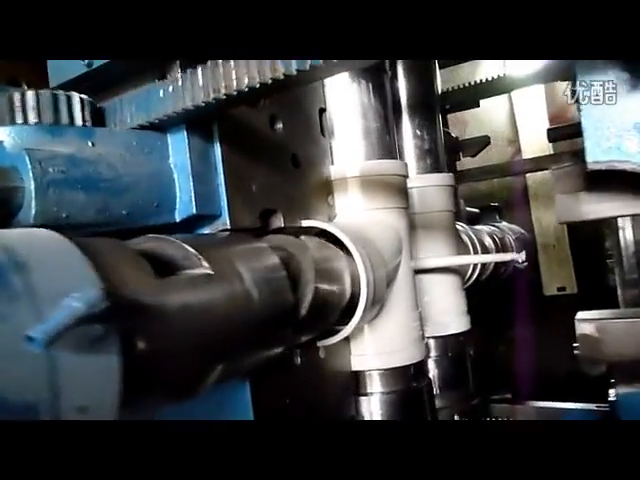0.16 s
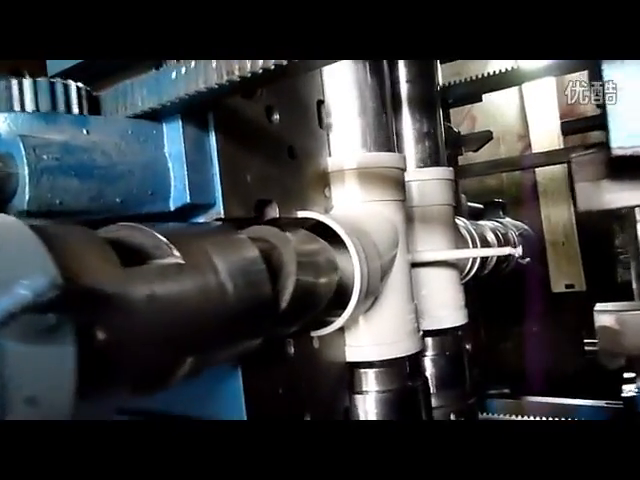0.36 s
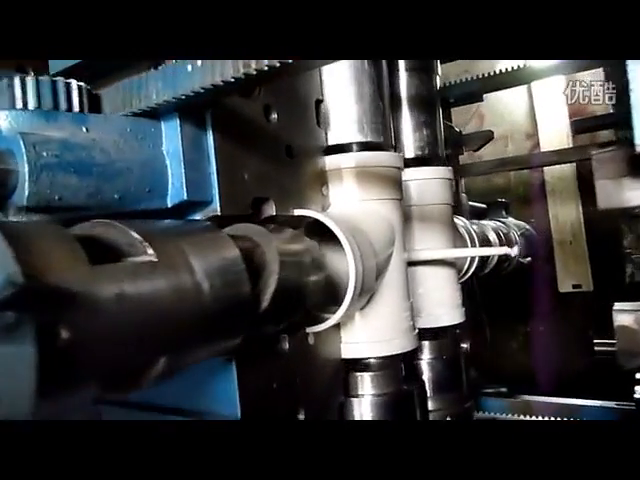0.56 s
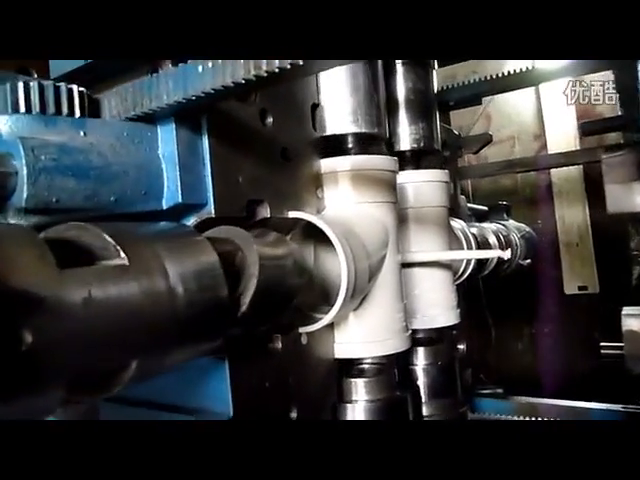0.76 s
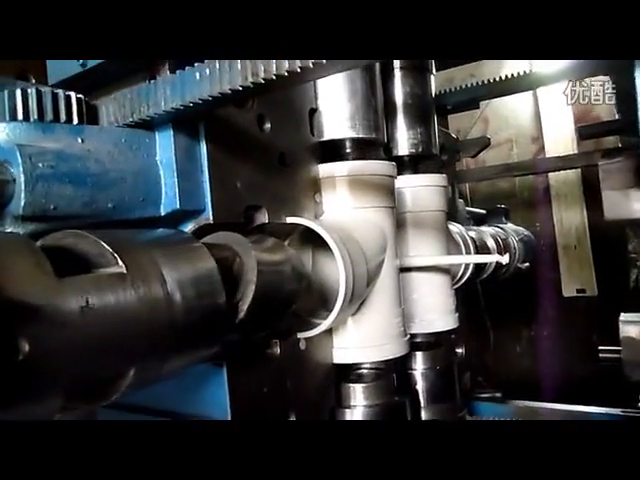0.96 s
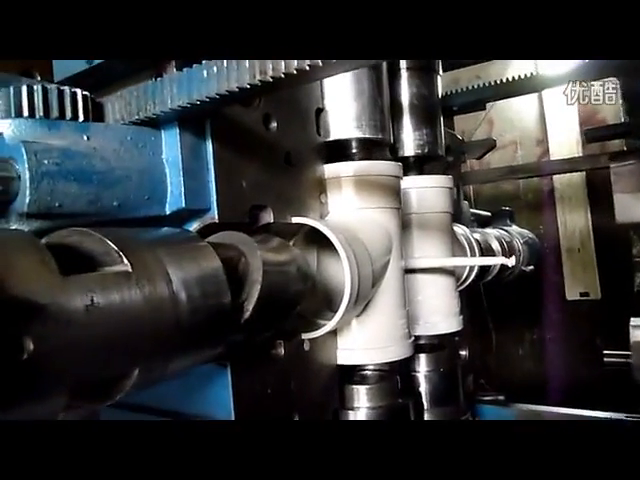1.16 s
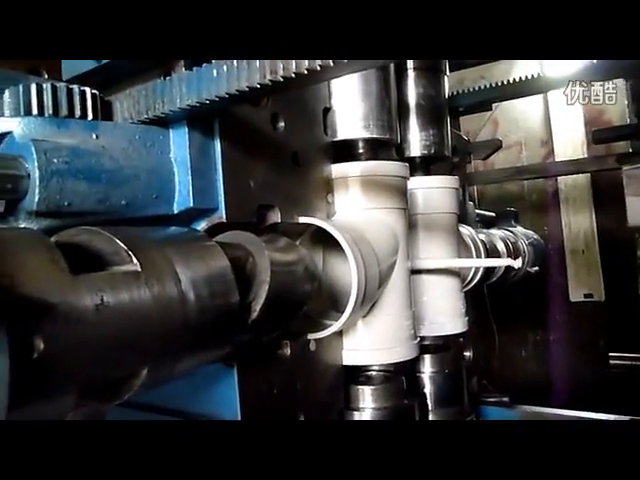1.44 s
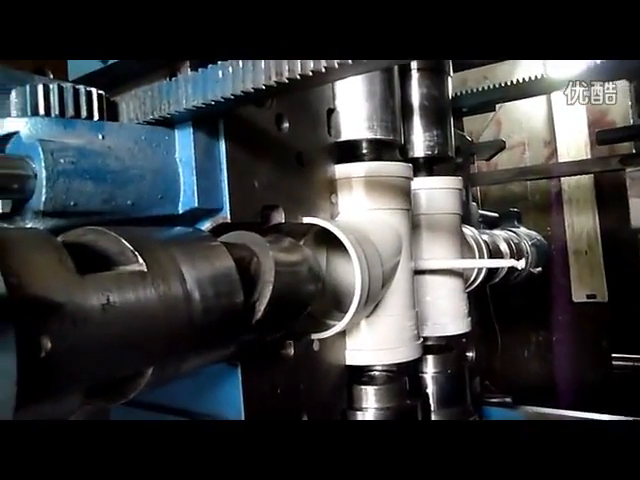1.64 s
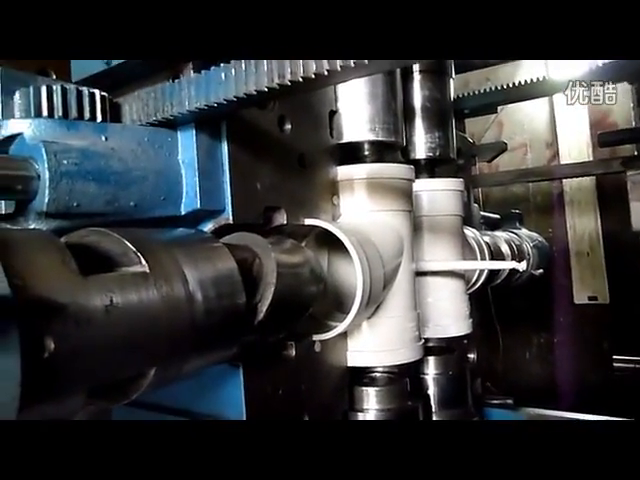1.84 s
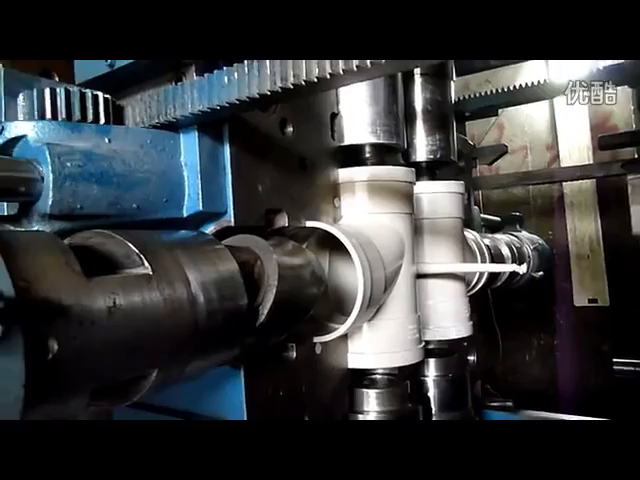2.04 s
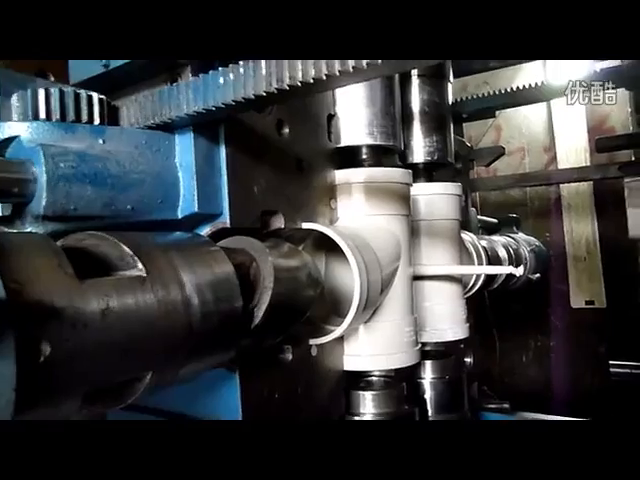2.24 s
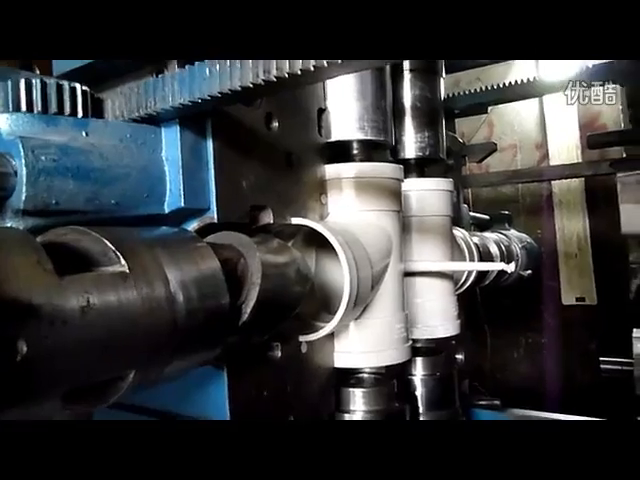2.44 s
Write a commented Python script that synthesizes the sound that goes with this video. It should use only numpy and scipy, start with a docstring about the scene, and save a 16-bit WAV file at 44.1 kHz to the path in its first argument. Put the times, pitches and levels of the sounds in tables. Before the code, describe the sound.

Steady hydraulic drone and hiss of a moulding machine, broken by a metal clack and thuds.

```python
"""On a factory floor, beside the open mould of an injection moulding machine. A hydraulic vane pump drones and
whines in a harmonic series, and turbulent oil hisses through a valve. A clack and a few thuds, the damped modes
of mould and frame, release the cores. These slide for a second with a rough rush of friction, the pump running
a little faster, and then the valve hiss returns. Drives whistle, the pump's shaft hums in its low orders and
the factory rumbles throughout."""
import sys
import numpy as np
from scipy import signal
from scipy.fft import rfft, irfft
from scipy.io import wavfile

SR = 44100
rng = np.random.default_rng(int(sys.argv[2]) if len(sys.argv) > 2 else 0)


def unload_audio(sound):
    """Save the sound as a 16-bit wav file, at the path given as the first command line argument."""
    columns = np.transpose(np.atleast_2d(sound))
    # keep every value between -1 and 1, then stretch to whole-number steps
    steps = np.round(np.clip(columns, -1, 1) * 32767)
    wavfile.write(sys.argv[1], SR, steps.astype(np.int16))


N = 113778


def undb(db):
    """Decibels to amplitude ratio."""
    return 10 ** (np.asarray(db) / 20)


def unit(x):
    """Normalisation to rms 1."""
    return x / np.sqrt(np.mean(x ** 2))


def curve(rows):
    """Linear interpolation between (seconds, value) points."""
    return np.interp(np.arange(N) / SR, *np.array(rows).T)


def walk(rate_hz):
    """Random fluctuation of rms 1: noise low-passed at rate_hz."""
    f = np.fft.rfftfreq(N, 1 / SR)
    return unit(irfft(rfft(rng.standard_normal(N)) * (f > 0) / (1 + (f / rate_hz) ** 4), N))


def colour(x, spectrum):
    """Spectral shaping by (Hz, relative dB) points, at rms 1."""
    hz, db = np.array(spectrum).T
    f = np.fft.rfftfreq(N, 1 / SR) + 1
    gain = undb(np.interp(np.log(f), np.log(hz), db))
    return unit(irfft(rfft(x) * gain, N))


def rush(spectrum, flicker_db=0, rate_hz=42):
    """Broadband noise with optional random amplitude modulation."""
    return colour(rng.standard_normal(N) * undb(flicker_db * walk(rate_hz)), spectrum)


def tone(hz):
    """A sinusoid of rms 1 whose phase is the integral of its frequency."""
    return np.sqrt(2) * np.sin(2 * np.pi * (np.cumsum(hz) / SR + rng.random()))


def load_level(loaded_db, free_db):
    """Load dependence: a level moves towards its free value while the cores slide."""
    freedom = curve([(.86, 0.29), (1.0, 0.78), (2.11, 1), (2.15, 0.65)])
    return loaded_db + (free_db - loaded_db) * freedom


def strike(blows, modes):
    """Modal superposition: each blow excites damped sinusoids, slightly detuned at random."""
    out = np.zeros(N)
    for start, peak_db in blows:
        age = np.maximum(np.arange(N) / SR - start, 0)
        ring = np.zeros(N)
        for hz, db, t60 in modes:
            detuned_hz = hz * (1 + 0.0067 * rng.standard_normal())
            ring += undb(db - 60 * age / t60) * np.sin(2 * np.pi * detuned_hz * age)
        out += undb(peak_db) * ring / np.abs(ring).max()
    return out


# Pump speed. Each row: time in seconds, vane-passing frequency in Hz.
VANE_RATE = [(0, 298.6), (.5, 298.6), (.87, 298.3), (.93, 299.5), (1.5, 299.45), (2.12, 299.5),
             (2.4, 298.5), (2.58, 299.0)]
# Each row: harmonic number, level under load in dB, level while the cores slide in dB.
PUMP_HARMONICS = [(1, -30, -31), (2, -29, -33), (4, -42, -45.5), (8, -46, -44), (9, -38, -64),
                  (13, -45.5, -40.5), (15, -47, -47.5), (16, -64, -57), (17, -47, -40), (19, -42, -51),
                  (20, -40, -47.5), (21, -57, -44.5), (22, -59, -51), (24, -45, -43.5), (26, -41.5, -41.5)]

def pump():
    """Periodic excitation: the vane pulses form a harmonic series on the vane-passing frequency."""
    vane_hz = curve(VANE_RATE) * (1 + 0.00041 * walk(12.3))
    return sum(tone(k * vane_hz) * undb(load_level(loaded, free) + 0.95 * walk(5.8))
               for k, loaded, free in PUMP_HARMONICS)


# Hiss spectra of the valve and the oil lines. Each row: frequency in Hz, relative density in dB.
VALVE_SPECTRUM = [(600, -52), (1300, -11.5), (1900, 9.5), (2700, -5), (3900, 7.5), (4700, 8), (5800, 4.5),
                  (7000, 2.5), (9000, -4.5), (13000, -43)]
LINES_SPECTRUM = [(4000, -31), (5800, -14), (7000, -6.5), (8300, -3), (9400, 1.5), (10100, -2),
                  (11300, -10.5), (12200, -22.5), (12800, -23), (13300, -49)]
# Envelopes of both hisses and of the valve's song. Each row: time in seconds, level in dB.
VALVE_ENVELOPE = [(0, -29.5), (.4, -30.5), (.78, -27), (.85, -28.5), (.93, -34.5), (1.1, -41.5),
                  (1.42, -49), (1.48, -30), (1.7, -47), (2.115, -43), (2.145, -28), (2.35, -29),
                  (2.58, -29.5)]
LINES_ENVELOPE = [(0, -30), (.78, -29.5), (.9, -32), (.99, -35), (1.06, -31.5), (1.2, -31), (1.4, -28),
                  (1.7, -27.5), (2.08, -29), (2.35, -27.5), (2.58, -29)]
SONG_ENVELOPE = [(0, -52), (.55, -55), (.66, -37), (.82, -38), (.9, -56), (2.11, -58), (2.16, -53),
                 (2.58, -45)]
# Reflections between the steel plates. Each row: delay in seconds, gain in dB.
PLATE_ECHOES = [(.00335, -17.5), (.0053, -22.5), (.0079, -8.5), (0.0101, -14.5)]

def oil():
    """Turbulent flow: hiss, modulated at the vane rate, is comb-filtered by short reflections."""
    ripple = 1 + .07 * tone(curve(VANE_RATE))
    valve = rush(VALVE_SPECTRUM) * undb(curve(VALVE_ENVELOPE))
    lines = rush(LINES_SPECTRUM, flicker_db=1.37, rate_hz=24) * undb(curve(LINES_ENVELOPE))
    hiss = (valve + lines) * ripple
    echoes = sum(undb(db) * np.roll(hiss, int(delay * SR)) for delay, db in PLATE_ECHOES)
    # The valve sings as the pressure peaks.
    song = tone(6864 + 12 * walk(60)) * undb(curve(SONG_ENVELOPE) + 2 * walk(24))
    return hiss + echoes + song


# Blows on the mould. Each row: start in seconds, peak level of the ring in dB.
MOULD_BLOWS = [(.8385, -7.5), (.8455, -22), (.853, -15), (1.153, -14), (1.473, -24), (2.464, -17)]
# Each row: mode frequency in Hz, relative level in dB, time to decay by 60 dB in seconds.
MOULD_MODES = [(525, -4, 0.09), (780, -2, 0.063), (890, 4.5, 0.038), (1170, -5, 0.017), (1253, -6, 0.042),
               (2320, -17, 0.017)]

def clacks():
    """Impact excitation: each blow rings the mould's modes and gives a brief broadband crack."""
    t = np.arange(N) / SR
    decay_s = .007
    bursts = sum(undb(db) * (t >= start) * np.exp(-np.abs(t - start) / decay_s)
                 for start, db in MOULD_BLOWS)
    spectrum = [(200, -30), (900, 9), (1300, 4), (2200, -3), (8000, -31), (12000, -50)]
    cracks = undb(-12) * bursts * colour(rng.standard_normal(N), spectrum)
    return strike(MOULD_BLOWS, MOULD_MODES) + cracks


# Blows on the frame. Each row: start in seconds, peak level in dB.
FRAME_BLOWS = [(.853, -14), (.865, -13), (.888, -21), (.903, -19.5), (.946, -18), (.987, -17)]
# Each row: mode frequency in Hz, relative level in dB, time to decay by 60 dB in seconds.
FRAME_MODES = [(70, -20, .15), (134, 11, 0.1), (164, -5, 0.073), (257, 5, 0.04)]

def thuds():
    """Damped free vibration: the struck frame sounds its low modes."""
    return strike(FRAME_BLOWS, FRAME_MODES)


# Friction noise of the cores. Each row: frequency in Hz, relative density in dB.
SLIDE_SPECTRUM = [(250, -24.5), (450, -0.5), (700, 1.5), (1000, 3.5), (1300, -3), (1700, -3.5), (3000, -53)]
# Its envelope. Each row: time in seconds, level in dB.
SLIDE_ENVELOPE = [(0, -42.5), (.98, -36), (1.02, -31), (1.16, -26.5), (1.28, -28.5), (1.65, -27.5),
                  (2.05, -31.5), (2.25, -34), (2.58, -39)]
# Resonances of the guides. Each row: centre frequency in Hz, bandwidth in Hz.
GUIDE_MODES = [(690, 68), (850, 50), (990, 62), (1210, 45)]

def slide():
    """Sliding friction: steel cores rub, ring their guides with fine catches and groan once."""
    t = np.arange(N) / SR
    catches_per_s, groan_hz, groan_at_s, groan_width_s = 700, 558, 1.51, .024
    catches = (rng.random(N) < catches_per_s / SR) * rng.standard_normal(N)
    rings = sum(signal.lfilter(*signal.iirpeak(hz, hz / width, fs=SR), catches)
                for hz, width in GUIDE_MODES)
    rub = rush(SLIDE_SPECTRUM, flicker_db=0.6, rate_hz=24)
    friction = unit(rub + 0.3 * colour(catches, SLIDE_SPECTRUM) + 0.38 * unit(rings))
    swell = np.exp(-np.abs(t - groan_at_s) / groan_width_s)
    groan = tone(groan_hz + 18 * walk(70)) * undb(-23) * swell
    return friction * undb(curve(SLIDE_ENVELOPE)) + groan


# Tones of the pump's drive, mostly orders of its shaft turning at about 24.9 Hz. Each row: frequency in Hz,
# level in dB.
SHAFT_TONES = [(99.7, -39), (149.6, -41), (199.4, -35), (224.4, -31), (249.3, -47), (349, -44.5),
               (399, -49), (623.5, -67), (920.5, -44), (1211, -45)]

def hum():
    """Superposition: the shaft's tones, each wavering in pitch and level, add to a hum."""
    return sum(tone(hz + 0.2 * walk(6.9)) * undb(db + 2 * walk(9.8)) for hz, db in SHAFT_TONES)


# Each row: frequency in Hz, level under load in dB, level while the cores slide in dB.
DRIVE_TONES = [(1614.5, -51, -43.5), (2185, -43.5, -43.5), (8177, -43.5, -46), (9193.5, -50, -42.5),
               (9765, -45, -42), (9974, -47, -43.5), (11473, -58, -49.5)]

def whistles():
    """Amplitude modulation: the thin tones of the drives follow the load in strength."""
    return sum(tone(hz + 2.26 * walk(11.4)) * undb(load_level(loaded, free) + 2 * walk(6))
               for hz, loaded, free in DRIVE_TONES)


# Factory noise. Each row: frequency in Hz, relative density in dB.
RUMBLE_SPECTRUM = [(20, -24), (35, -31), (52, 3), (85, -7), (140, 0.5), (250, 0.5), (330, -4.5),
                   (450, -8.5), (850, -6.5), (1400, -12.5), (2300, -14), (3500, -21.5), (6000, -22.5),
                   (13000, -50.5)]

def rumble():
    """Ambient noise: the factory has a continuous spectrum, strongest in the bass."""
    return undb(-25) * rush(RUMBLE_SPECTRUM, flicker_db=0.74, rate_hz=11.3)


# The drone sags briefly as the load comes off. Each row: time in seconds, gain in dB.
DRONE_SAG = [(0, 0.5), (.85, -0.5), (.9, -1), (.97, -1.5), (1.03, -1.5), (1.15, 0), (2.58, 0)]

def scene():
    """Linear superposition: all sources add at one microphone, the same in both channels."""
    drone = (pump() + hum() + whistles() + rumble()) * undb(curve(DRONE_SAG))
    mono = drone + oil() + slide() + clacks() + thuds()
    return np.array([mono, mono])


# Notches of the microphone. Each row: centre frequency in Hz, bandwidth of one filter pass in Hz.
MICROPHONE_NOTCHES = [(3010, 565), (5210, 440), (10570, 500)]

def record(dry):
    """Frequency response: the microphone has three deep notches and a limited passband."""
    notched = dry
    for hz, width in MICROPHONE_NOTCHES:
        b, a = signal.iirnotch(hz, hz / width, fs=SR)
        notched = signal.lfilter(b, a, signal.lfilter(b, a, notched))
    leak = undb(-53.5) * dry  # limits the depth of the notches
    low_cut = signal.butter(2, 48, "high", fs=SR, output="sos")
    high_cut = signal.ellip(10, .2, 80, 13050, fs=SR, output="sos")
    return signal.sosfilt(high_cut, signal.sosfilt(low_cut, notched + leak))


dry = scene()
out = record(dry)
unload_audio(out)
```